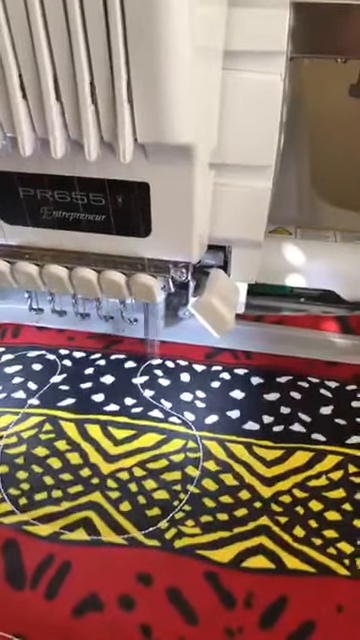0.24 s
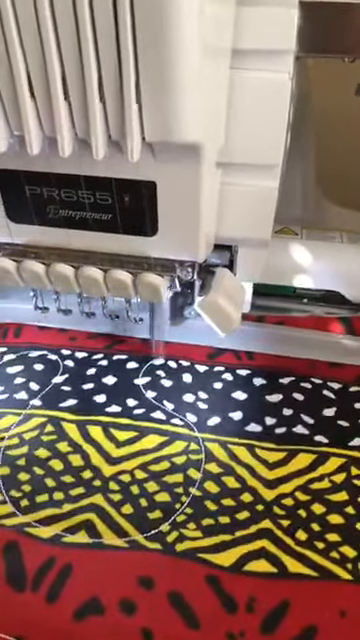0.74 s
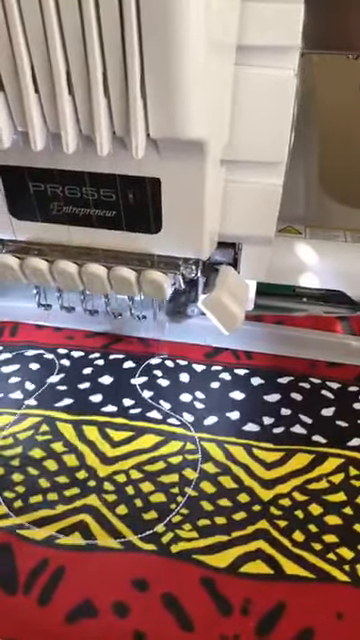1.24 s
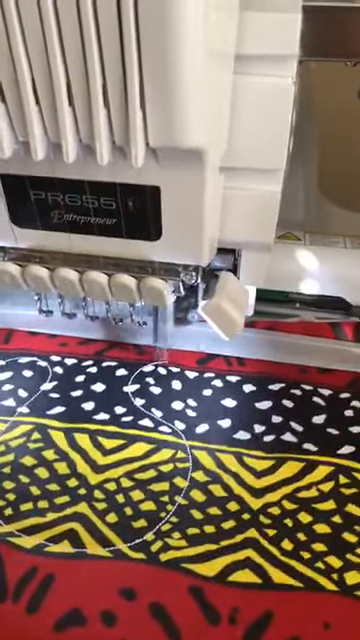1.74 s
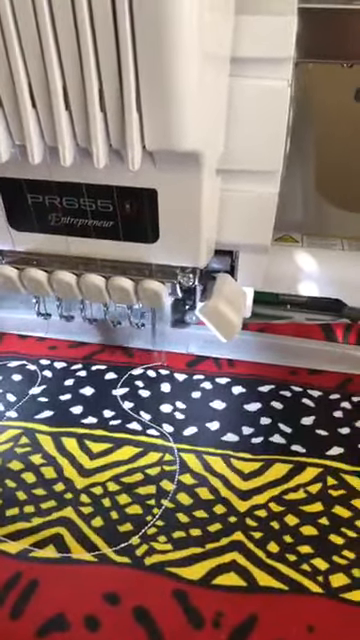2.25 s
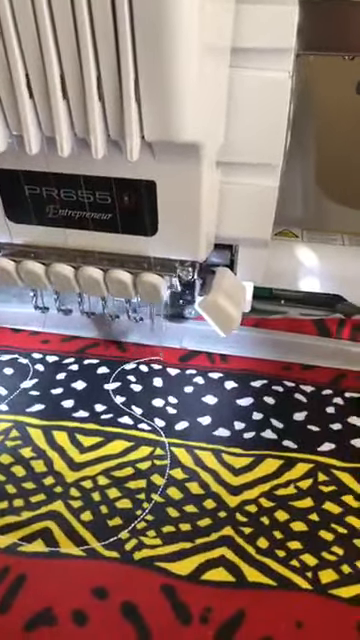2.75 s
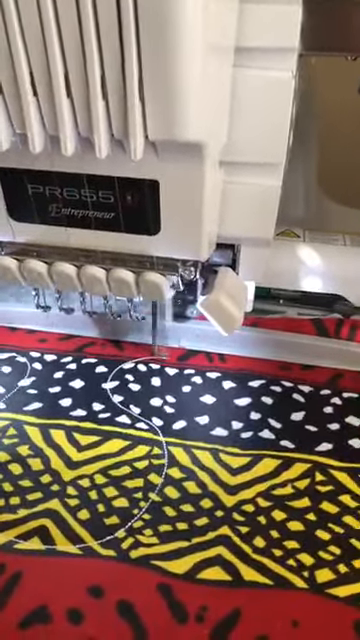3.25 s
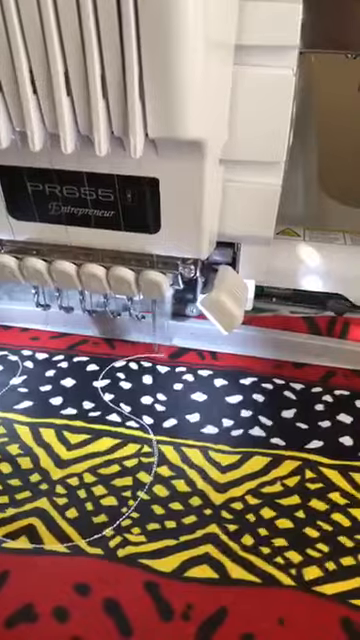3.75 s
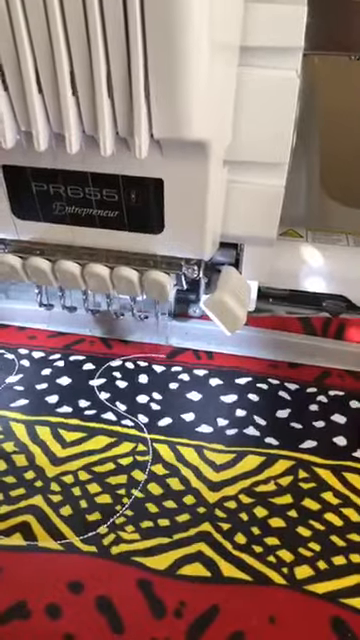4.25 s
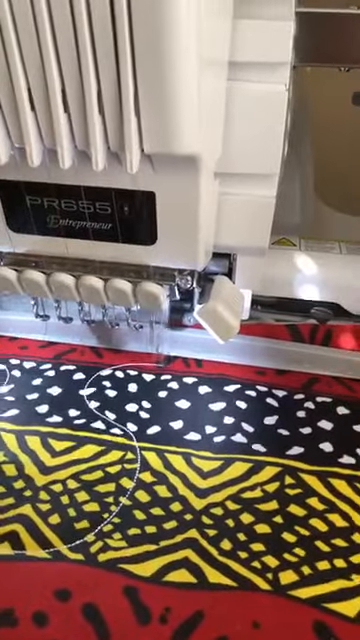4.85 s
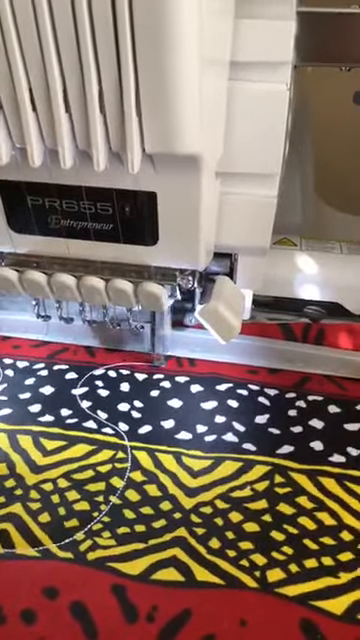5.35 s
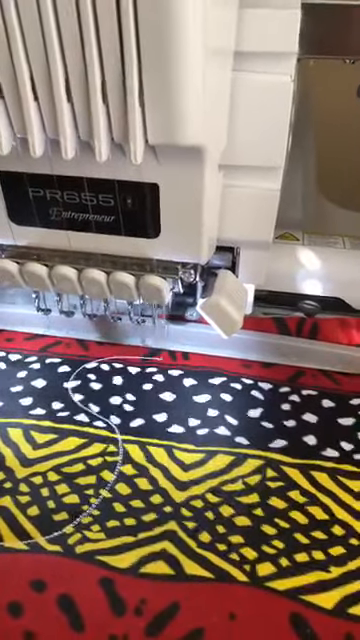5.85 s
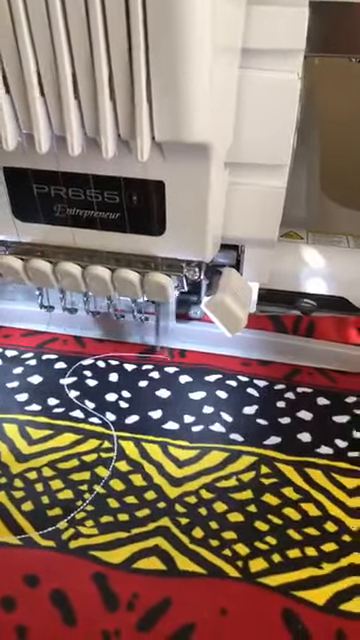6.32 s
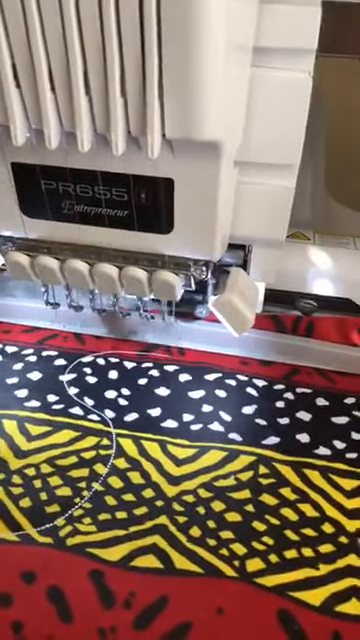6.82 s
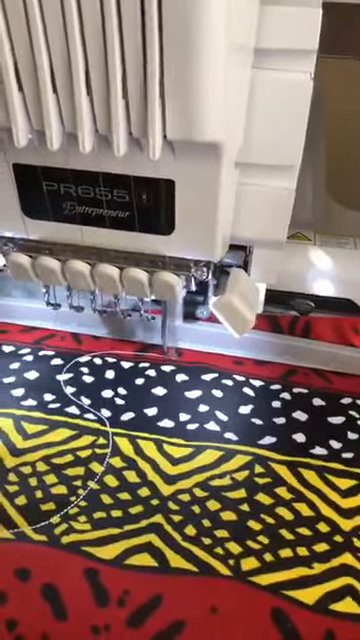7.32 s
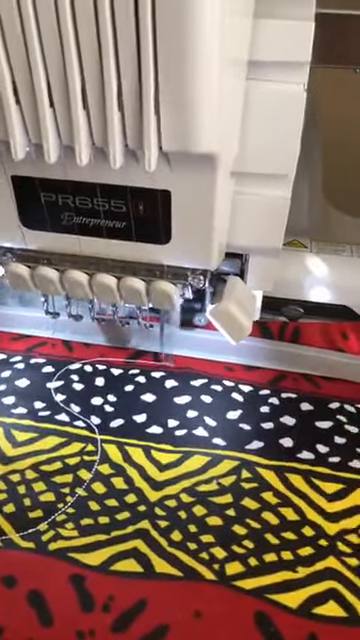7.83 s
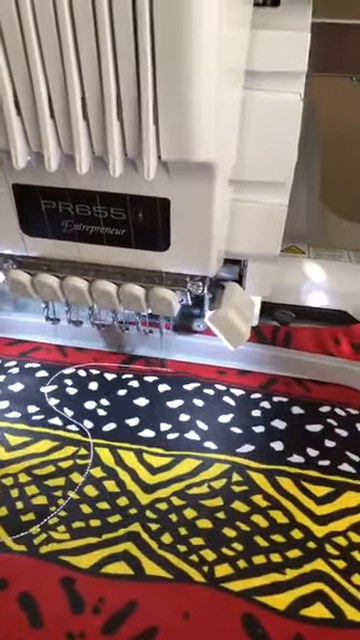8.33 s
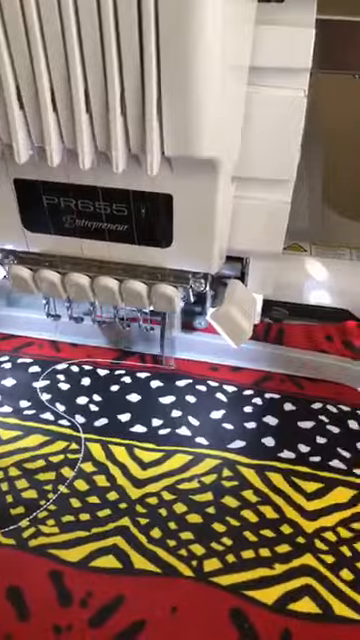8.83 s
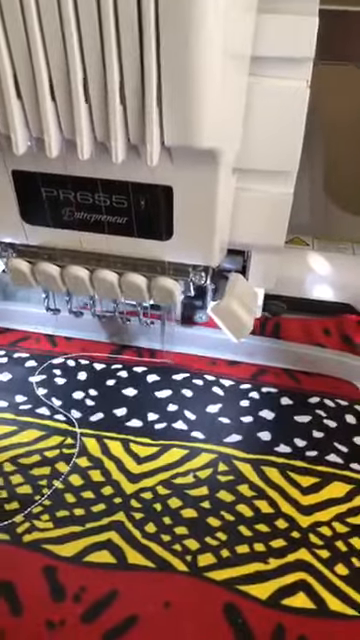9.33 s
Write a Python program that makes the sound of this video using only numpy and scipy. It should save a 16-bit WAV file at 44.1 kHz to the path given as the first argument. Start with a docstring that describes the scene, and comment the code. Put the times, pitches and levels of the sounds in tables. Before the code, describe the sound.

Rapid, steady needle thuds and rattling from an embroidery machine, with a high pulsing whistle, heard up close indoors.

```python
"""An embroidery machine sews a triple running stitch at about 800 stitches a minute, heard from close by.
Each stitch opens with a soft thud of the needle bar; impacts start the linkage clattering and the head
ringing near 2 kHz. Two stepper motors chirp in turn, the shoved hoop booms and the stand hums. Last,
the thread rasps through the cloth. The hoop goes forward, forward, back, so the bass beats in threes.
The ringing grows over the first five seconds, and now and then the thread snags."""
import sys
import numpy as np
from scipy import signal
from scipy.fft import rfft, irfft, next_fast_len
from scipy.io import wavfile
from scipy.ndimage import uniform_filter1d

SR = 44100
rng = np.random.default_rng(int(sys.argv[2]) if len(sys.argv) > 2 else 0)


def dump(signal):
    """Clip the signal to [-1, 1] and save it as 16-bit WAV at the path in sys.argv[1]."""
    limited = np.clip(np.atleast_2d(signal).T, -1, 1)
    pcm = np.round(limited * 32767).astype(np.int16)
    wavfile.write(sys.argv[1], SR, pcm)


N = 422478
FIRST_STITCH_S, STITCH_S = .05458, .0752006

# The three stitches of the pattern. Each row: direction (+1 forward, -1 back), hoop delay in ms,
# then level offsets in dB for hoop, second motor, clatter and thread.
TRIPLE_STITCH = [(1, 1, 0.5, -3, -0.02, 1.8), (1, -1, 2, -1.3, 0, -0.8), (-1, 0.04, 3, 0.6, 0, -0.6)]
# Contacts of needle bar, take-up lever and hook. Each row: time into the stitch in ms,
# levels in dB at bed, covers and steel, time to decay by 60 dB in ms.
IMPACTS = [(5.01, -29, -34.5, -58, 51), (7.7, -45, -48, -31, 75), (20.5, -38, -39, -27.5, 23),
           (23.3, -30, -25, -27.5, 41), (28.87, -26.5, -27, -29, 44), (33, -41, -29.5, -30, 25),
           (36.27, -26, -30.5, -31.5, 23), (37.9, -26, -27, -31, 54), (46.2, -24.5, -40.5, -30, 42),
           (46.6, -48, -38, -36.5, 16), (57.1, -28.5, -45, -50, 47), (56.44, -29.5, -37, -58, 47)]
# Modes of stand, bed, plastic covers and steel parts.
# Each row: frequency in Hz, bandwidth in Hz, relative level in dB.
STAND_MODES = [(250, 24.5, 2), (287, 40, -2), (367, 52, -3.5)]
BED_MODES = [(482.4, 43, -4.5), (553.5, 23.7, 4), (606, 52, 0.5), (774, 85, -2.5), (902, 48, -4),
             (957, 19, -3)]
COVER_MODES = [(1104.4, 55, -2.5), (1242, 75, 0.5), (1333, 118, -2), (1514, 31, 1.5), (1604, 51, -1.5),
               (1794, 82, -1), (1938, 97, -1.5), (2094, 28, 3), (2333, 38, -2), (2664, 135, -5.5)]
STEEL_MODES = [(3220, 125, -0.5), (3483, 40, 3), (3645, 42, 4), (4050, 106, 0), (4390, 75, -3),
               (4586, 50, -0.5), (4750, 99, -3.5), (5090, 53, -6), (5260, 110, -2), (5810, 53, -7)]
# Glides of the two hoop motors, the hoop's sway, the needle bar's thud and the stand's hum.
# Each row: time into the stitch in ms, frequency in Hz, level in dB.
FIRST_CHIRP = [(5.877, 1493, -63), (11.755, 2541, -31.5), (14.8, 2700, -24), (16.94, 2545, -19),
               (19.5, 2406, -28.5), (22.07, 2627, -22.5), (26.99, 1484, -51), (30.23, 1240, -29.5),
               (32.5, 750, -29.5)]
SECOND_CHIRP = [(25.94, 2238, -44), (29.95, 2505, -23), (33, 2475, -29), (36.56, 2472, -21.5),
                (37.15, 2592, -19), (38.44, 1040, -30), (39.02, 430, -29.5), (40.6, 430, -28.5),
                (44, 540, -52)]
HOOP_SWAY = [(29.52, 147, -49), (40.3, 142, -34.5), (49, 146, -29), (53.6, 139, -33), (65, 137, -35),
             (80.4, 155, -39)]
NEEDLE_THUD = [(2, 118, -32.5), (7.7, 155, -48), (13.9, 148, -41.5), (25.7, 145, -42.5), (31.4, 380, -70)]
STAND_HUM = [(14.9, 381, -54), (22, 369.5, -38), (44.4, 364.3, -32.5), (54, 423, -44)]
# Jolts that excite the head. Each row: time into the stitch in ms, level in dB.
HEAD_JOLTS = [(5.42, -23.5), (7.99, -29.5), (19.89, -26.5), (22.4, -26), (32.78, -26.5), (49.44, -20.5),
              (58.81, -30), (69.18, -28)]
# Motor load, thread drag and snags as the hoop travels. Each row: time in seconds, level in dB.
MOTOR_LOAD = [(0, 1.5), (1.3, 1), (4.5, -.5), (7.3, -0.8), (9.5, 0)]
THREAD_DRAG = [(0, -41), (0.7, -31), (1.7, -36), (2.9, -32), (4.9, -34), (5.5, -30), (6.1, -34),
               (7.0, -29.5), (7.4, -35.5), (9.5, -36.5)]
THREAD_SNAGS = [(0.712, -30), (5.299, -30), (7.179, -29), (8.533, -34)]
# Spectra of steel ticks, thread and room. Each row: frequency in Hz, relative spectral density in dB.
TICK_SPECTRUM = [(900, -42), (2000, -0.5), (2900, -2.5), (3400, -1.5), (4400, -2), (5400, -2), (6500, -2.5),
                 (7800, -3), (9700, -6.5), (10400, -9), (13000, -11.5), (15500, -10)]
THREAD_SPECTRUM = [(1500, -5), (3000, -15.5), (3650, 3.5), (4200, -2.5), (5400, -2.5), (7000, -7.5),
                   (10000, -11), (16000, -16)]
ROOM_SPECTRUM = [(20, 6), (40, -6), (65, -16), (90, -4), (190, 15), (400, -15), (1500, -23), (16000, -43)]


def linkage(stitch, ms):
    """Impact excitation: contacts drive each part's modes; the higher the sound, the less it repeats."""
    _, bed_db, cover_db, steel_db, _ = np.transpose(IMPACTS)
    stand = impact_force(stitch, ms, bed_db, floor_db=-23.5, alike=0.58, grain_db=0, spread_db=0.44)
    bed = impact_force(stitch, ms, bed_db, floor_db=-37, alike=0.55, grain_db=0.5, spread_db=0.5)
    covers = impact_force(stitch, ms, cover_db, floor_db=-36.5, alike=0.51, grain_db=0.6, spread_db=0.7)
    ticks = impact_force(stitch, ms, steel_db, floor_db=-36.5, alike=0.43, grain_db=2, spread_db=0.78)
    rings = impact_force(stitch, ms, steel_db, floor_db=-36.5, alike=0.38, grain_db=1, spread_db=1.5)
    return (from_db(-16.5) * colour(stand, resonances(STAND_MODES))
            + from_db(-3) * colour(bed, resonances(BED_MODES))
            + from_db(-0.5) * colour(covers, resonances(COVER_MODES))
            + from_db(-1.45) * colour(ticks, spectrum(TICK_SPECTRUM))
            + from_db(-7.5) * colour(rings, resonances(STEEL_MODES)))


def impact_force(stitch, ms, levels_db, floor_db, alike, grain_db, spread_db):
    """Incoherent bursts add in power; the share `alike` of that power repeats in every stitch."""
    size = round(STITCH_S * SR)
    grid_ms = np.arange(size) * 1000 / SR
    power = from_db(floor_db) ** 2
    for (start_ms, *_, t60_ms), db in zip(IMPACTS, levels_db):
        age_ms = (grid_ms - start_ms) % grid_ms[-1]
        power = power + from_db(db - 60 * age_ms / t60_ms) ** 2
    envelope = np.sqrt(power)
    push = rfft(envelope * grit(grain_db)[:size])
    push /= np.sqrt(uniform_filter1d(abs(push) ** 2, size=4))  # hard contacts have a flat spectrum
    repeated = rms_one(irfft(push, size)) * np.sqrt(power.mean())
    place = np.minimum(np.searchsorted(grid_ms, ms), size - 1)
    *_, clatter_db, _ = pattern(stitch)
    strength = stitch_gain(stitch, spread_db) * from_db(clatter_db)
    fresh = envelope[place] * grit(grain_db)
    return strength * (np.sqrt(alike) * repeated[place] + np.sqrt(1 - alike) * fresh)


def motors(stitch, ms):
    """A stepper sounds at its step rate, so it chirps as it speeds up and brakes; load sets the level."""
    *_, second_db, _, _ = pattern(stitch)
    first = glide(FIRST_CHIRP, ms) * stitch_gain(stitch, spread_db=0.5)
    second = glide(SECOND_CHIRP, ms) * stitch_gain(stitch, spread_db=1.5) * from_db(second_db)
    load_db = np.interp(np.arange(N) / SR, *np.transpose(MOTOR_LOAD))
    return from_db(load_db) * (first + second)


def head(stitch, ms, mode_hz=2032.3, t60_s=0.054, rise_db_per_s=0.73, free_at_s=5.0):
    """Superposition: one damped mode is jolted again before it has died, giving a throbbing whistle."""
    period_ms = STITCH_S * 1000
    grid_ms = np.linspace(0, period_ms, num=8192)
    ring = 0
    for start_ms, db in HEAD_JOLTS:
        age_s = (grid_ms - start_ms) % period_ms / 1000
        ring = ring + from_db(db - 60 * age_s / t60_s) * np.sin(2 * np.pi * mode_hz * age_s)
    # as the hoop travels the head rings more freely, up to a steady level
    level_db = 1.45 - rise_db_per_s * np.maximum(free_at_s - np.arange(N) / SR, 0)
    return np.interp(ms, grid_ms, ring) * from_db(level_db) * stitch_gain(stitch, spread_db=0.8)


def hoop(stitch, ms, stiffest_s=3.6, boom_db_per_s=0.18):
    """Transient vibration: a needle bar thud, then the hoop's sway, inverted on the back stitch."""
    direction, delay_ms, sway_db, *_ = pattern(stitch)
    play_ms = 0.31 * rng.standard_normal(stitch.max() + 2)[stitch]
    sway = np.sign(direction) * from_db(sway_db) * glide(HOOP_SWAY, ms - delay_ms - play_ms)
    # the hoop booms least in mid travel, where it is held most stiffly
    boom_db = -1.75 + boom_db_per_s * abs(np.arange(N) / SR - stiffest_s)
    return from_db(boom_db) * (sway * stitch_gain(stitch, spread_db=1.8) + glide(NEEDLE_THUD, ms))


def thread(stitch, ms, pull_ms=63.1, width_ms=6.0):
    """Friction noise: thread is drawn through the cloth late in each stitch; a snag rasps louder."""
    *_, thread_db = pattern(stitch)
    drag_db = np.interp(np.arange(N) / SR, *np.transpose(THREAD_DRAG)) + thread_db
    strength = from_db(drag_db - 2) * stitch_gain(stitch, spread_db=2.2)
    for time_s, db in THREAD_SNAGS:
        strength[stitch == stitch[int(time_s * SR)]] = from_db(db)
    pull = np.exp(-.5 * ((ms - pull_ms) / width_ms) ** 2)
    return colour(strength * pull * grit(grain_db=4.5), spectrum(THREAD_SPECTRUM))


def stand_hum(stitch, ms):
    """Forced vibration: the drive shakes one low note out of the stand in every stitch."""
    return glide(STAND_HUM, ms) * stitch_gain(stitch, spread_db=1.5)


def room_rumble():
    """Ambient noise: faint and steady, with most of its power at low frequencies."""
    return from_db(-52) * colour(rng.standard_normal(N), spectrum(ROOM_SPECTRUM))


def shaft():
    """One turn makes one stitch: each sample's stitch number and the ms since that stitch began."""
    turns = (np.arange(N) / SR - FIRST_STITCH_S) / STITCH_S
    return np.floor(turns).astype(int), turns % 1 * STITCH_S * 1000


def pattern(stitch):
    """A period of three stitches: the columns of TRIPLE_STITCH at every sample."""
    return np.array(TRIPLE_STITCH)[stitch % len(TRIPLE_STITCH)].T


def stitch_gain(stitch, spread_db):
    """Log-normal scatter: a random gain that holds for one stitch."""
    return from_db(spread_db * rng.standard_normal(stitch.max() + 2))[stitch]


def glide(rows, ms):
    """Phase is the integral of frequency: a tone that takes the same course in every stitch."""
    times_ms, hz, db = np.transpose(rows)
    grid_ms = np.arange(times_ms[0], times_ms[-1], 1000 / SR)
    phase = 2 * np.pi * np.cumsum(np.interp(grid_ms, times_ms, hz)) / SR
    tone = from_db(np.interp(grid_ms, times_ms, db)) * np.sin(phase)
    return np.interp(ms, grid_ms, tone, left=0, right=0)


def grit(grain_db):
    """Random amplitude modulation makes white noise grainy."""
    return rms_one(rng.standard_normal(N) * from_db(grain_db * rng.standard_normal(N)))


def resonances(modes):
    """Modal sum: the frequency response of parallel resonators of alternating sign."""
    hz = np.fft.rfftfreq(next_fast_len(N, real=True), 1 / SR)
    return sum((-1) ** k * from_db(db) * 1j * hz * width / (centre ** 2 - hz ** 2 + 1j * hz * width)
               for k, (centre, width, db) in enumerate(modes))


def spectrum(points):
    """Spectral envelope: levels in dB joined along a logarithmic frequency axis."""
    hz, db = np.transpose(points)
    bins_hz = np.fft.rfftfreq(next_fast_len(N, real=True), 1 / SR)
    return from_db(np.interp(np.log(bins_hz + 1), np.log(hz), db))


def colour(x, response):
    """Linear filtering, scaled so that white noise keeps its power."""
    size = next_fast_len(N, real=True)
    return irfft(rfft(x, size) * response / np.sqrt(np.mean(abs(response) ** 2)), size)[:N]


def from_db(db):
    """Amplitude grows tenfold for every 20 dB."""
    return 10 ** (np.asarray(db) / 20)


def rms_one(x):
    """Normalisation to unit mean power."""
    return x / np.sqrt(np.mean(x ** 2) + 1e-20)


def scene():
    """Sound pressures add: all parts keep time with the main shaft, over the room's rumble."""
    stitch, ms = shaft()
    parts = (linkage, motors, head, stand_hum, hoop, thread)
    return (room_rumble() + sum(part(stitch, ms) for part in parts))[None]


def record(dry, low_hz=69.6, high_hz=15800):
    """Band limiting: a small microphone thins the deep bass, and the top is cut steeply."""
    thin = signal.sosfilt(signal.butter(3, low_hz, "high", fs=SR, output="sos"), dry)
    return signal.sosfilt(signal.ellip(12, .1, 90, high_hz, fs=SR, output="sos"), thin)


dry = scene()
out = record(dry)
dump(out)
```